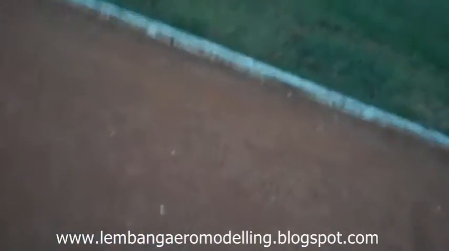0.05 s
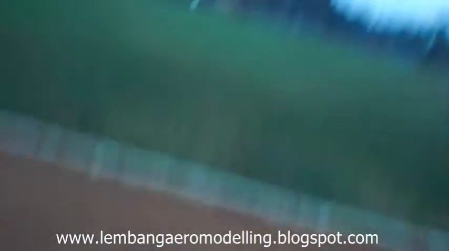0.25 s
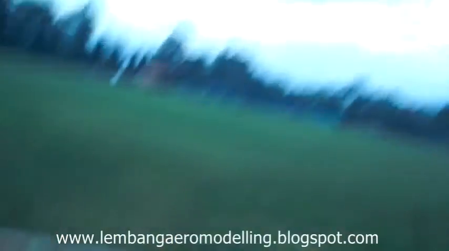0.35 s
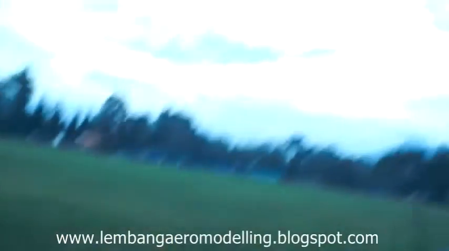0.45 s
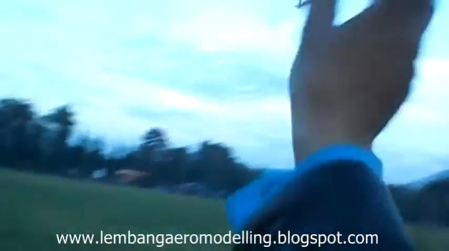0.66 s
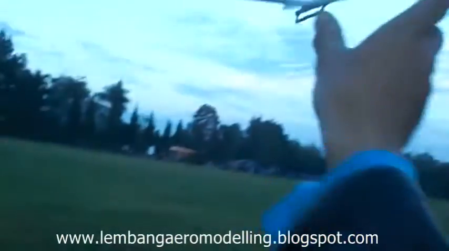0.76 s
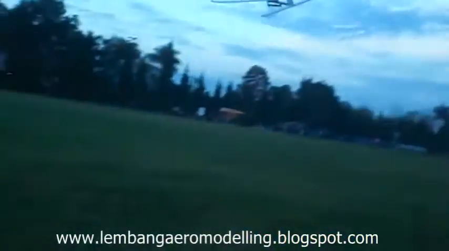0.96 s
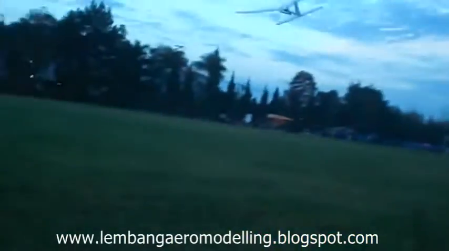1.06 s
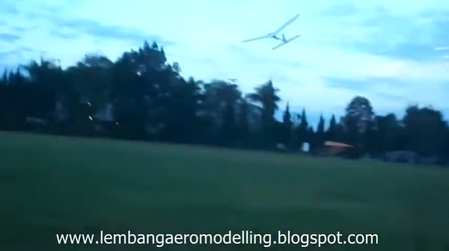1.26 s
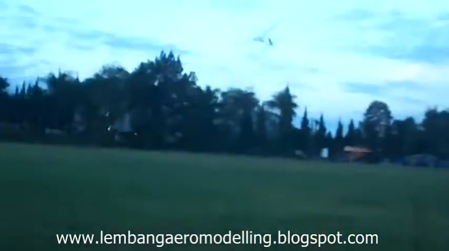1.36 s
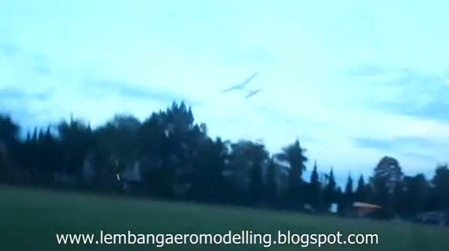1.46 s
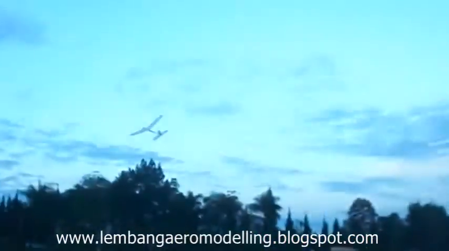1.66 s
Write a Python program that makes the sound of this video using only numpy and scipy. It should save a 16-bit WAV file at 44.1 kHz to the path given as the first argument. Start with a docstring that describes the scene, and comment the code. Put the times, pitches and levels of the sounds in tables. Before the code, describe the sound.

Close to the microphone outdoors, a model plane's propeller knocks unevenly, then clatters rapidly and dies away as the throw buffets the microphone. Faint cloth rustle, small ticks and a dull handling knock follow above a distant rumble.

```python
"""Hand launch of a rubber-powered model plane

Close by on an open field, a propeller stutters into motion while the unwinding rubber patters. Its
shaft then clacks against the light airframe three times a turn, fading as the plane flies off.
The throw puffs air on the microphone, a sleeve rustles and a finger knocks the camera,
all over a low distant rumble."""
import sys
import numpy as np
from scipy import signal
from scipy.fft import rfft, irfft, next_fast_len
from scipy.io import wavfile
from scipy.ndimage import uniform_filter1d

SR = 44100
rng = np.random.default_rng(int(sys.argv[2]) if len(sys.argv) > 2 else 0)


def wrap_up_sound(samples):
    """Save the sound to the file named by the first command line argument, as 16-bit audio."""
    columns = np.atleast_2d(samples).T
    # keep every value between -1 and 1, then stretch to whole-number steps
    tamed = np.clip(columns, -1, 1)
    steps = np.round(tamed * 32767).astype(np.int16)
    wavfile.write(sys.argv[1], SR, steps)


N = 74970

# dry crack of a contact: f/Hz, level/dB
CRACK_COLOUR = [(300, -63), (1000, -10), (2000, -3), (3400, 5.5), (5000, -2.5), (6300, 2), (8000, -4.5),
                (10000, -1), (13000, -9.5), (16000, -19)]
# resonances of the airframe: f/Hz, level/dB, t60/s
AIRFRAME_MODES = [(457, -44.5, 0.048), (823, -43, 0.032), (1125, -46.5, 0.048), (1205, -42, 0.053),
                  (1705, -38, 0.042), (1811, -39, 0.042), (2278, -37, 0.053), (2475, -37, 0.023),
                  (2635, -45, 0.023), (3350, -40, 0.019), (4060, -45, 0.021), (4640, -43, 0.012),
                  (6080, -44, 0.0098), (6260, -44.5, 0.02)]
CRACK_DB = -5.5   # trim on the hand-held clacks and the rubber's crackle


def from_db(db):
    """Decibels to gain."""
    return 10 ** (np.asarray(db) / 20)


def rms_one(x):
    """Scale to unit rms."""
    return x / np.sqrt(np.mean(x ** 2) + 1e-20)


def in_time(rows):
    """Breakpoint rows (t/s, values...) to one per-sample curve for each value."""
    times, *columns = np.transpose(rows)
    return [np.interp(np.arange(N) / SR, times, column) for column in columns]


def colour(x, points):
    """Minimum-phase EQ through (f/Hz, level/dB) points."""
    size = 2 * next_fast_len(N)
    hz, db = np.transpose(points)
    grid = np.maximum(np.arange(size // 2 + 1) * SR / size, 1)
    cepstrum = irfft(np.log(from_db(np.interp(np.log(grid), np.log(hz), db))))
    cepstrum[1:size // 2] *= 2   # folded forward, so nothing rings ahead of a click
    cepstrum[size // 2 + 1:] = 0
    return irfft(rfft(x, size) * np.exp(rfft(cepstrum)))[:N]


def ring(x, modes):
    """A struck body: every click sets off one decaying sine per mode."""
    out = np.zeros(N)
    for k, (hz, db, t60) in enumerate(modes):
        r, w = np.exp(-np.log(1000) / (t60 * SR)), 2 * np.pi * hz / SR
        mode = signal.lfilter([0, np.sin(w)], [1, -2 * r * np.cos(w), r * r], x + 1e-18)
        out += (-1) ** k * from_db(db) * mode
    return out


def grains(per_s, spread_db):
    """Random clicks of uneven size, rms 1 per click."""
    sizes = from_db(spread_db * np.minimum(rng.exponential(1, N), 5)) * rng.choice([-1, 1], N)
    return rms_one(sizes) * (rng.random(N) < per_s / SR)


def contacts(times, gains, chatter_s, rebounds_per_s=12000, rebound_gain=.59, size=512):
    """One click per contact, followed by a dying chatter of tiny rebounds."""
    out = np.zeros(N + size)
    fade = np.exp(-np.arange(size) / SR / chatter_s)
    for s, gain in zip(times, gains):
        burst = rebound_gain * fade * rng.standard_normal(size)
        burst *= rng.random(size) < rebounds_per_s / SR
        burst[0] = 1
        start = int(np.clip(s * SR, 0, N - 1))
        out[start:start + size] += gain * burst / np.linalg.norm(burst)
    return out[:N]


def tone(hz, db, waver_hz):
    """A sine whose pitch wanders by waver_hz rms."""
    waver = rms_one(uniform_filter1d(rng.standard_normal(N), size=1500))
    return np.sqrt(2) * from_db(db) * np.sin(2 * np.pi * np.cumsum(hz + waver_hz * waver) / SR)


def field():
    """The bed: distant rumble and hiss, a wavering drone and a thin, slowly sinking whistle."""
    # faint far whistle: t/s, f/Hz, level/dB
    whistle_path = [(.74, 1385, -75), (.82, 1401, -62), (.95, 1380, -59), (1.12, 1377, -57),
                    (1.25, 1353, -68.5), (1.46, 1317, -66), (1.62, 1313, -64), (1.7, 1310, -71)]
    # steady tones in the rumble: f/Hz, level/dB
    drone_tones = [(100, -54.5), (150, -48.5)]
    # rumble and hiss: f/Hz, level/dB
    rumble_colour = [(20, -37), (40, -7.5), (60, -4), (85, -9), (115, -0.5), (150, -2.5), (200, -9.5),
                     (270, -21), (450, -27.5), (1000, -32.5), (2200, -38.5), (6000, -44), (11000, -45.5),
                     (16000, -47)]
    whistle = tone(*in_time(whistle_path), waver_hz=5.5)
    drone = sum(tone(hz, db, waver_hz=5.3) for hz, db in drone_tones)
    rumble = rms_one(colour(rng.standard_normal(N), rumble_colour))
    return whistle + drone + from_db(-42.5) * rumble


def sleeve(grains_per_s=5500):
    """Cloth rubs in a grainy rustle as the arm comes down, with a few quick brushes late on."""
    # swell of the rustle: t/s, level/dB
    rustle_fader = [(.15, -56), (.55, -52.5), (.70, -49), (.82, -55), (.92, -48.5), (.99, -49.5),
                    (1.08, -48), (1.15, -50.5), (1.20, -53.5), (1.28, -52.5), (1.32, -57), (1.7, -59.5)]
    # tone of the rustle: f/Hz, level/dB
    rustle_colour = [(100, -2.5), (300, -0.5), (1100, -3), (1500, -3), (2000, -6), (3200, -6.5),
                     (6000, -14), (10000, -24.5), (16000, -27)]
    # brushes of cloth: peak t/s, level/dB, rise/s, fall/s
    brushes = [(1.234, -39, 0.0059, 0.0069), (1.250, -39.5, 0.0052, 0.0071), (1.3958, -31, 0.0089, 0.00052)]
    # tone of the brushes: f/Hz, level/dB
    brush_colour = [(200, 5), (1200, -5.5), (2400, -0.5), (3000, -4.5), (3800, 7), (5200, -3.5),
                    (7500, -12), (10000, -8.5), (16000, -22)]
    t = np.arange(N) / SR
    rustle = rms_one(colour(grains(grains_per_s, spread_db=3.4), rustle_colour))
    brushing = rms_one(colour(grains(grains_per_s, spread_db=2.2), brush_colour))
    strokes = sum(from_db(db) * np.exp(-np.maximum((s - t) / rise, (t - s) / fall))
                  for s, db, rise, fall in brushes)
    return from_db(in_time(rustle_fader)[0]) * rustle + strokes * brushing


def air_puffs():
    """The throw buffets the microphone with low turbulence and single swings of pressure."""
    # swell of the draught: t/s, level/dB
    draught_fader = [(0, -68), (.16, -50.5), (.20, -38.5), (.26, -37), (.30, -45), (.345, -35.5),
                     (.40, -30.5), (.45, -37.5), (.52, -39.5), (.58, -30), (.61, -39.5), (.68, -43),
                     (.76, -51), (1.7, -68)]
    # tone of the draught: f/Hz, level/dB
    draught_colour = [(20, -14.5), (48, -0.5), (80, 1), (150, -6), (300, -16.5), (600, -25), (1500, -50.5)]
    # single puffs: t/s, peak level/dB, f/Hz
    puffs = [(0.347, -26, 122), (.391, -20.5, 139), (0.4359, -23, 190), (0.4872, -21, 158),
             (0.547, -19, 115), (.558, -12.5, 169), (0.5607, -25, 320), (0.5864, -20.5, 99),
             (0.6634, -20, 100)]
    turbulence = rms_one(colour(rng.standard_normal(N), draught_colour))
    out = from_db(in_time(draught_fader)[0]) * turbulence
    for s, db, hz in puffs:
        phase = 2 * np.pi * hz * (np.arange(N) / SR - s)
        out += from_db(db) * phase * np.exp((1 - phase * phase) / 2)   # one pull, one push
    return out


def rubber():
    """The unwinding rubber patters on the airframe: a ringing rasp, then a bright crackle at speed."""
    # layers of the rattle: t/s, ring level/dB, rasp level/dB, crackle level/dB
    rattle_faders = [(.14, -62, -55, -70), (.185, -25, -28.5, -59), (.215, -21, -21, -48),
                     (.30, -21, -21, -40), (.365, -16.5, -21.5, -18), (.41, -19, -23, -23),
                     (.48, -29, -28, -26.5), (.56, -27, -32.5, -30), (.70, -37, -30.5, -32),
                     (.80, -52, -39, -35), (.9, -59.5, -58, -41.5)]
    # dull, dry rasp: f/Hz, level/dB
    rasp_colour = [(200, -6.5), (450, 0), (850, -2), (1400, -3.5), (2200, -6), (6000, -15.5),
                   (11000, -27.5), (16000, -33)]
    ring_gain, rasp_gain, crackle_gain = from_db(in_time(rattle_faders))
    patter = grains(per_s=2400, spread_db=2.26)
    body = ring(ring_gain * patter, AIRFRAME_MODES)
    rasp = colour(rasp_gain * patter, rasp_colour)
    crackle = colour(crackle_gain * grains(per_s=1500, spread_db=2), CRACK_COLOUR)
    return body + rasp + from_db(CRACK_DB) * crackle


def propeller_stutter(chatter_s=.00095):
    """The loose propeller knocks unevenly, ringing the airframe; the knocks harden as it speeds up."""
    # uneven knocks: t/s, ring level/dB, crack level/dB
    knocks = [(0.157, -10, -28), (0.1713, -11, -29), (0.2038, -1, -17), (.2155, -5, -23), (0.228, -6, -16),
              (0.2309, 7, -9), (.248, -2, -23), (.2605, -5, -23), (.2742, 0, -14), (.290, -4, -24),
              (0.305, -4, -20), (.321, -5, -18), (0.3426, -4, -10.5), (0.3483, 6, -15), (.3785, -23, -9),
              (.3962, -5, -5.5), (.455, -16, -15), (0.467, -28, -6.5), (0.4937, -10, -9.5),
              (0.5325, -23, -11), (.571, -7, -24)]
    times, ring_db, crack_db = np.transpose(knocks)
    crack = colour(contacts(times, from_db(crack_db), chatter_s), CRACK_COLOUR)
    body = ring(contacts(times, from_db(ring_db), chatter_s), AIRFRAME_MODES)
    return crack + body


def shaft_clacks(start_s=.3474, release_s=.555, turns=20, jitter_s=.0002, spread_db=1.0):
    """The shaft hits the airframe three times a turn: crisp in the hand, duller and longer in flight."""
    # propeller speed: t/s, rate/(turns per s)
    speed = [(.365, 27.4), (.40, 26.7), (.44, 26.15), (.63, 26.0), (.67, 27.4), (.71, 26.3)]
    # hits within a turn: delay/s, level/dB, send to the airframe (0-1), chatter decay/s
    hits = [(0, 0, 0.8, 0.0022), (.0127, -6.5, .2, .0006), (.0200, -12.5, .2, .0007)]
    # the plane comes close and leaves: t/s, level/dB
    fly_by = [(.345, -5.5), (.385, 0.5), (.425, 4.5), (.46, 2), (.50, 1), (.537, 2), (.575, -5.5),
              (.615, -8), (.69, -7), (.73, -16.5), (.85, -20.5), (1.1, -39)]
    # crack of a contact in flight: f/Hz, level/dB
    flight_colour = [(300, -30), (1000, -6), (2200, 3.5), (3600, 4.5), (6000, 1), (10000, -6.5),
                     (13000, -4.5), (16000, -27)]
    t = np.arange(N) / SR
    turned = np.cumsum(in_time(speed)[0]) / SR
    turn_times = np.interp(np.interp(start_s, t, turned) + np.arange(turns), turned, t)
    held = flying = shaking = 0
    for delay_s, db, send, chatter_s in hits:
        times = turn_times + delay_s + jitter_s * rng.standard_normal(turns)
        nearness_db = np.interp(times, *np.transpose(fly_by))
        gains = from_db(db + nearness_db + spread_db * rng.standard_normal(turns))
        in_hand = contacts(times, gains * (times < release_s), chatter_s)
        in_flight = contacts(times, gains * (times >= release_s), 2.4 * chatter_s)
        held += in_hand
        flying += in_flight
        shaking += send * (in_hand + from_db(-6) * in_flight)
    held_crack = from_db(CRACK_DB) * colour(held, CRACK_COLOUR)
    flight_crack = from_db(-4.5) * colour(flying, flight_colour)
    return held_crack + flight_crack + ring(shaking, AIRFRAME_MODES)


def handling(knock_s=1.4027):
    """Small handling ticks, then a finger lands on the camera: a dull thud with a short ring."""
    # small ticks: t/s, level/dB
    tick_cues = [(1.058, -22), (1.0745, -30), (1.089, -27), (1.105, -31), (1.126, -26), (1.1442, -25),
                 (1.2265, -28), (1.2322, -22), (1.2365, -20), (1.363, -14.5)]
    # tone of the ticks: f/Hz, level/dB
    tick_colour = [(300, -13), (1400, -5), (2200, 7), (3200, 0.5), (5600, 3.5), (7500, -14), (16000, -16)]
    # thud of the finger: f/Hz, level/dB
    thud_colour = [(20, -19), (70, 3), (200, 5.5), (500, -0.5), (1000, -4), (2500, -19.5), (5000, -19.5),
                   (9000, -21), (16000, -42.5)]
    # resonances of the camera body: f/Hz, level/dB, t60/s
    camera_modes = [(1970, -25, 0.01), (4050, -39, 0.0079), (7600, -40, 0.012)]
    times, db = np.transpose(tick_cues)
    ticks = colour(contacts(times, from_db(db), chatter_s=.00075), tick_colour)
    blow = np.zeros(N)
    blow[int(knock_s * SR)] = -1
    thud = from_db(11.5) * colour(blow, thud_colour)
    return ticks + thud + ring(blow, camera_modes)


def scene():
    """Field, plane and thrower, mixed to mono."""
    mix = field() + propeller_stutter() + shaft_clacks() + rubber() + air_puffs() + sleeve() + handling()
    return mix[None]


def record(dry, low_cut_hz=35, high_cut_hz=16200):
    """The microphone loses the deepest bass; the top is cut steeply."""
    thinned = signal.sosfilt(signal.butter(2, low_cut_hz, "high", fs=SR, output="sos"), dry)
    return signal.sosfilt(signal.ellip(10, .2, 80, high_cut_hz, fs=SR, output="sos"), thinned)


dry = scene()
out = record(dry)
wrap_up_sound(out)
```